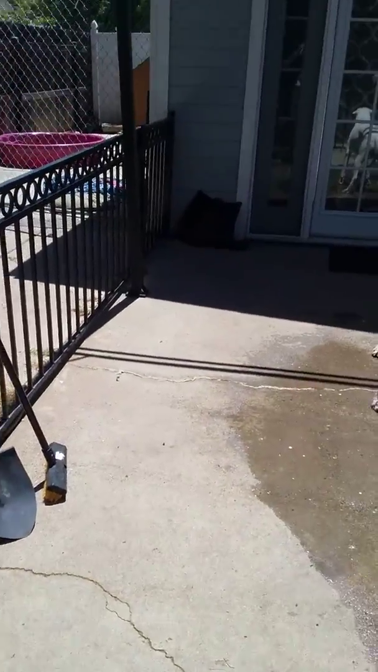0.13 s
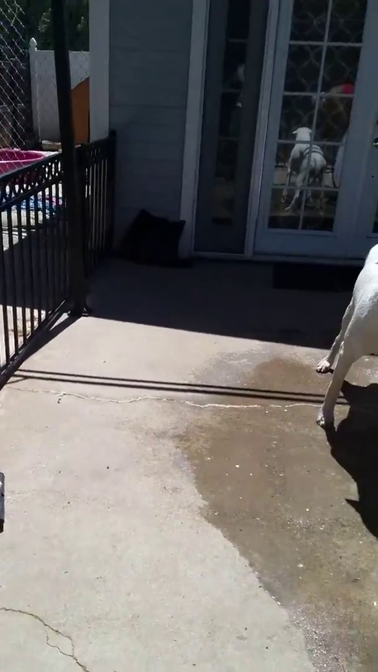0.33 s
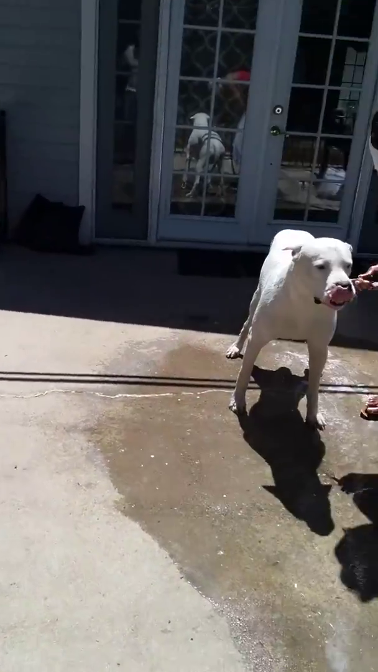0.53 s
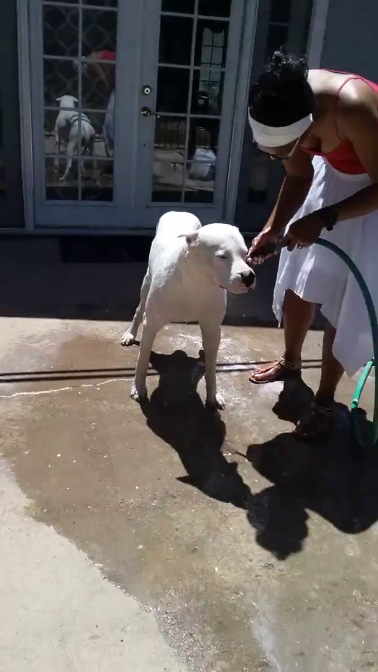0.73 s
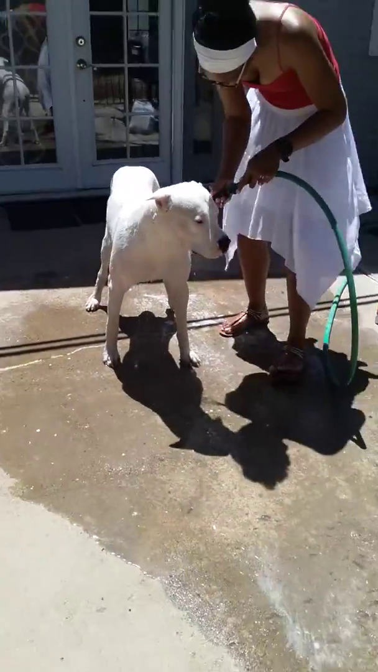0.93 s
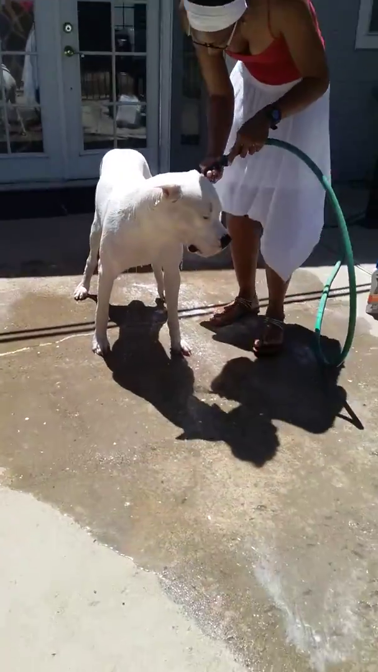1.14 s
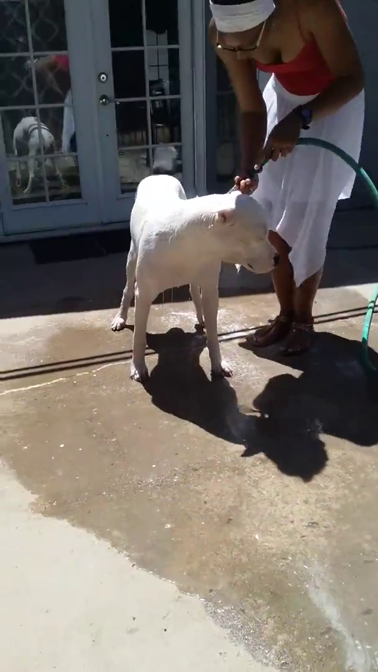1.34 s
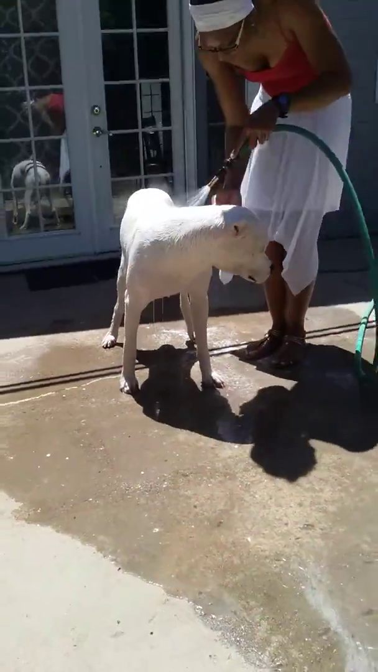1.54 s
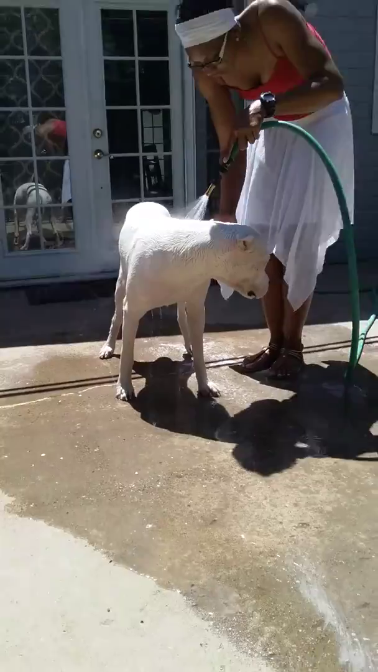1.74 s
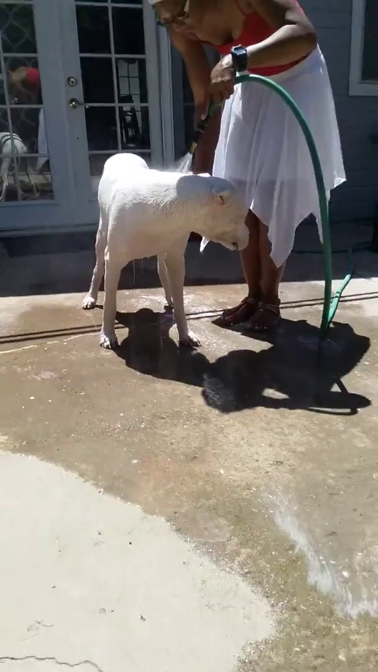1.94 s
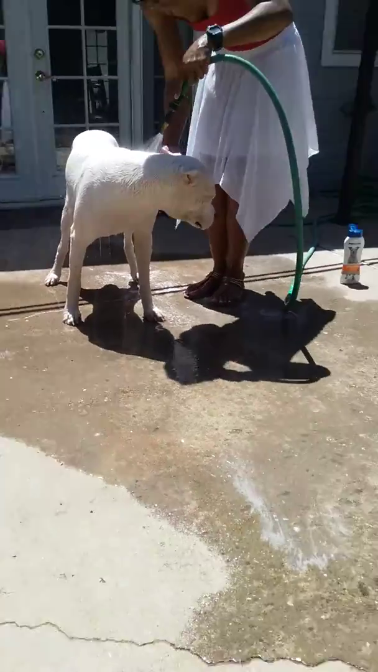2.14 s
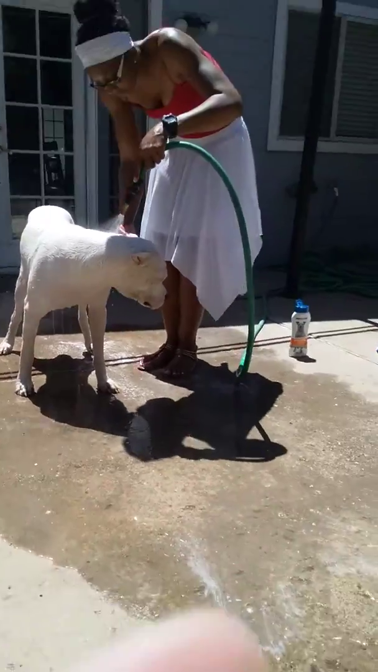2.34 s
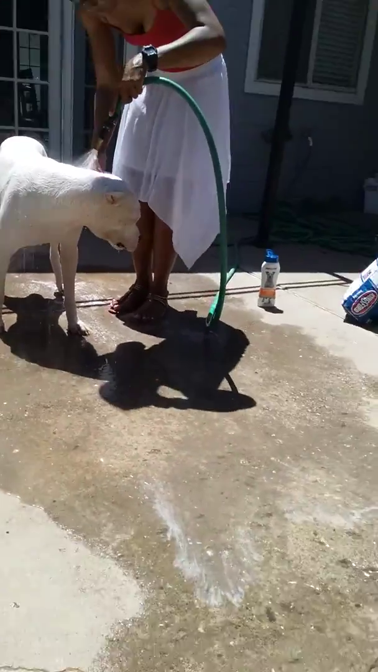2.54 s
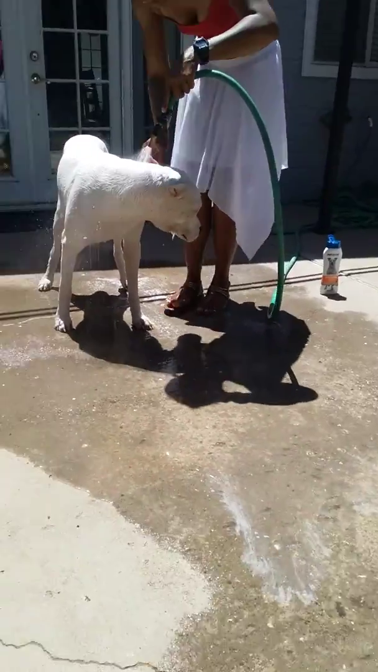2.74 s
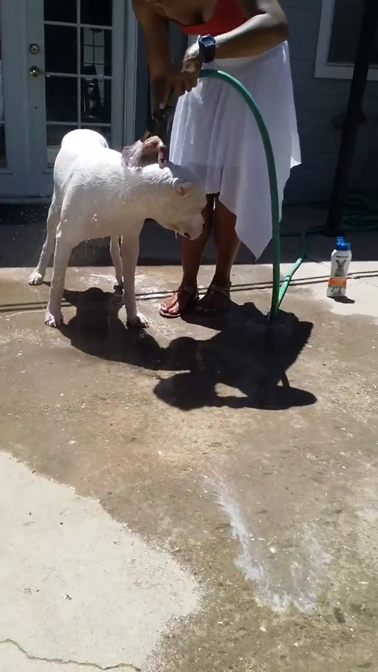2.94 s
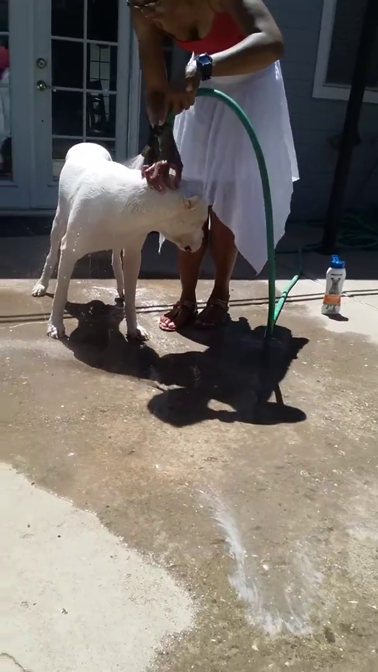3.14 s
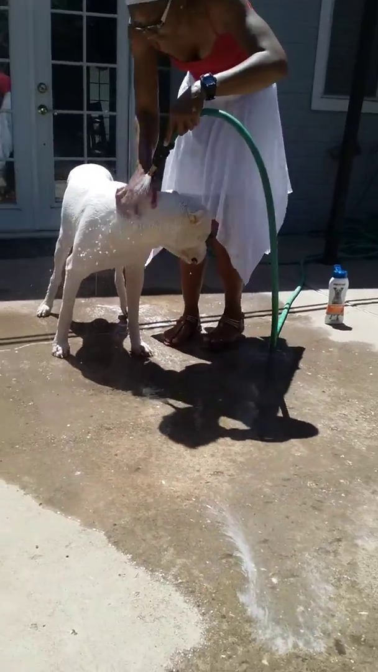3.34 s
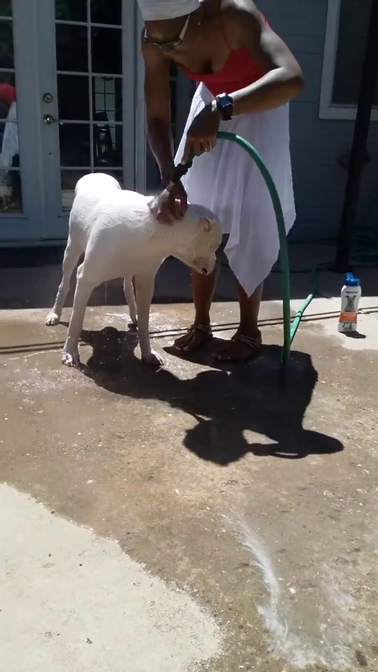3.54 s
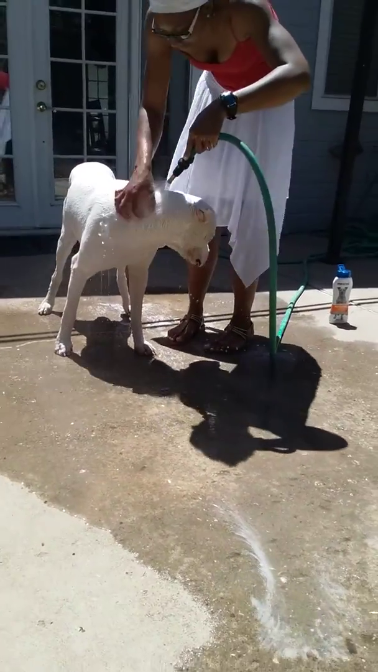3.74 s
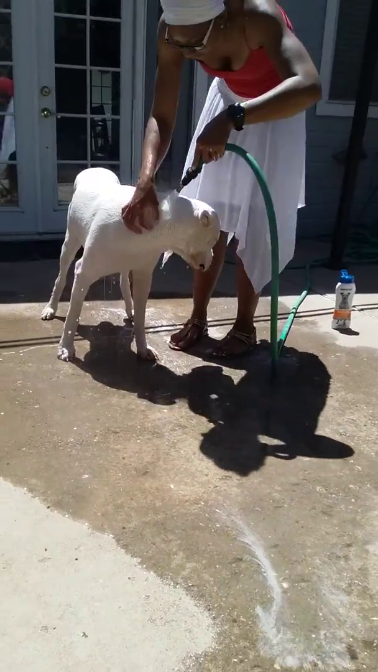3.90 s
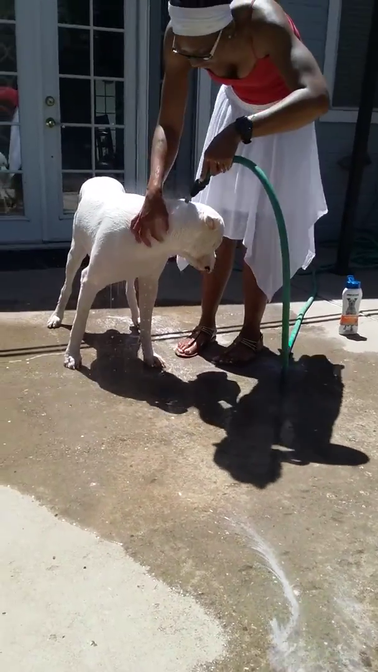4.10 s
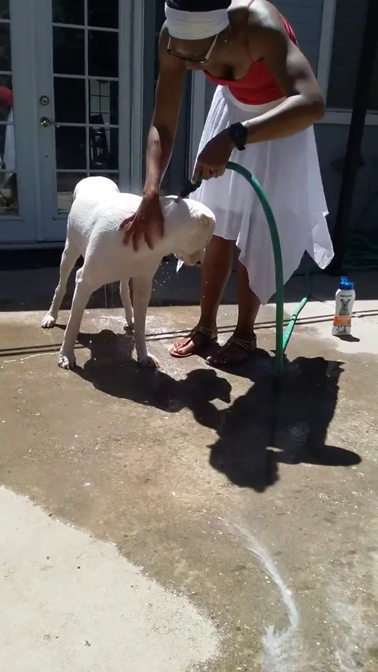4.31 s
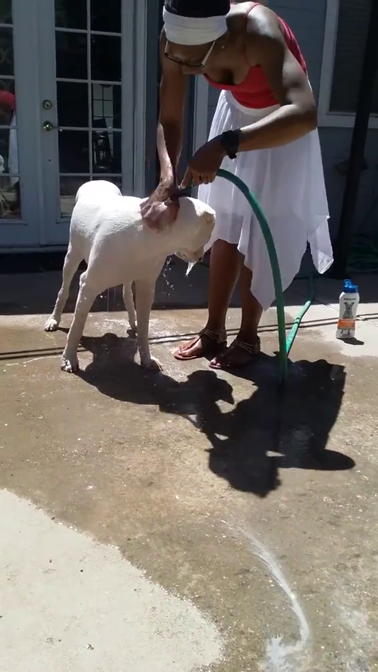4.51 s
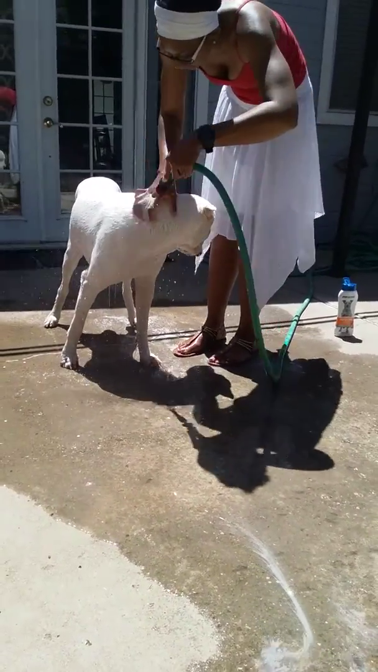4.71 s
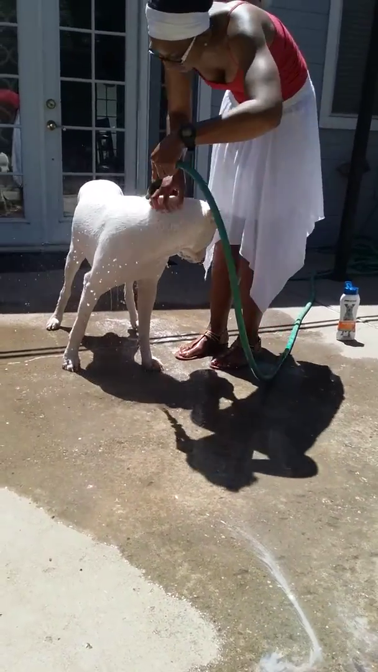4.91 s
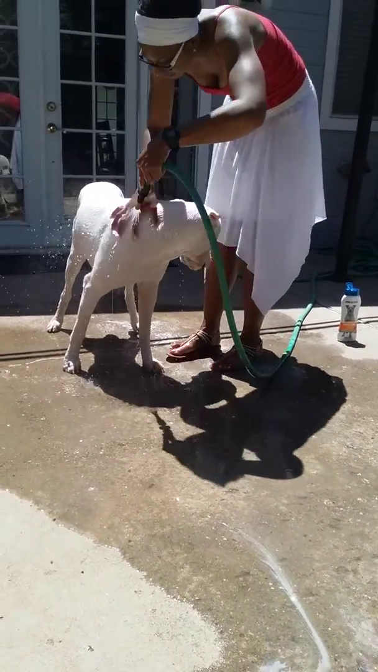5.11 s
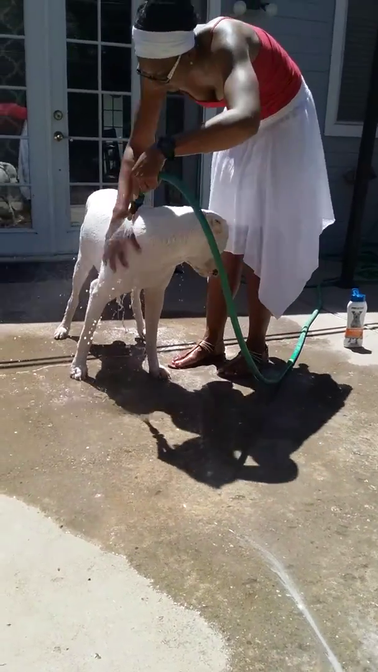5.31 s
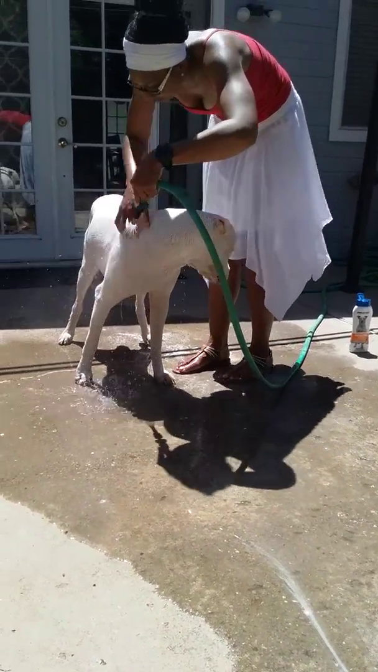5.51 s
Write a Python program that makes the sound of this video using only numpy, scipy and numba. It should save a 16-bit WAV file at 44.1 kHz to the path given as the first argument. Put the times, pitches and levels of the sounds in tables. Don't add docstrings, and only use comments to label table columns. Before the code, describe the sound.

Stereo phone capture outdoors: a sharp woody bang, slightly to the right, with brief yard echo, then a small knock and low rattling thuds. Hose water starts thin and rises into a bright, grainy hiss with spatter on fur and concrete, swelling and dipping unevenly as a hand moves through it. Soft scuffs, tiny slaps and isolated plinks appear over very faint distant traffic.

```python
import sys
import numpy as np
from scipy import signal
from scipy.fft import rfft, irfft, next_fast_len
from scipy.io import wavfile
from scipy.ndimage import uniform_filter1d, map_coordinates
from numba import njit

SR = 44100
rng = np.random.default_rng(int(sys.argv[2]) if len(sys.argv) > 2 else 0)


def invert_db(x):
    u = np.asarray(x, float) / 20
    return 10 ** u


def wav_out(sig):
    wavfile.write(sys.argv[1], SR, np.round(np.clip(np.atleast_2d(sig).T, -1, 1) * 32767).astype(np.int16))


N = 245136

# freq_hz, density_db_per_hz
SPRAY_COLOUR = [(350, -50), (600, -20), (869, -6.5), (1050, -14.5), (1350, -3), (1530, -9), (1700, -6),
                (2180, -4.5), (2440, -0.5), (3080, -2), (3480, 1.5), (5710, -4), (8270, -4), (15100, -14.5),
                (16000, -9.5)]
# freq_hz, left_minus_right_db
PORTS = [(60, 1.5), (110, -3), (200, -1), (380, -1.0), (700, -2), (1290, -0.5), (2380, -6), (4400, 1.5),
         (8120, 4.5), (15000, -3.5)]
# freq_hz, common_share_0_to_1
LIKENESS = [(60, 1), (300, 0.74), (1000, 0.34), (3000, 0.36), (8000, 0.4), (16000, 0.2)]
# freq_hz, left_lead_rad
LEAD = [(0, 0), (1290, -0.1), (1640, 0.0), (2150, 3.0), (2580, 1.1), (2930, 2.2), (3620, 9.7), (4480, 11.2),
        (5940, 9.6), (6630, 18.4), (8610, 18.8), (11500, 17.9), (13600, 15.1), (16500, 15.6)]
# freq_hz, density_db_per_hz
HUM = [(15, -50), (25, -27), (43, 0), (107, 1.5), (125, -0.5), (146, -22), (193, -3.5), (250, -17),
       (320, -45), (550, -120)]
# freq_hz, density_db_per_hz
SCUFF_COLOUR = [(250, 3), (350, -2), (500, -0.5), (700, 1)]
# time_s, hiss_db
NOZZLE = [(0.0, -11), (0.15, -5.5), (0.3, -11.5), (0.5, -3.5), (0.7, -9.5), (1.1, -7), (1.5, -6),
          (1.8, 0.5), (2.3, -1.5), (3.4, -0.3), (4.0, -0.6), (4.5, 0.5), (5.56, 0)]
# time_s, spatter_db
SPATTER = [(0.0, -9), (0.2, -8.5), (0.45, -0.5), (0.7, -4), (1.0, -5), (1.5, -1.5), (2.0, -0.04),
           (2.8, 2.25), (3.5, -5), (3.9, 4.5), (4.4, 2), (4.6, -2.5), (5.1, 6), (5.56, -2.5)]
HANDOVER_HZ = [4300, 6000]
# time_s, resonance_hz
HOLLOW = [(0.0, 1810), (0.49, 1360), (0.74, 1850), (1.28, 2060), (1.36, 1697), (2.54, 2030), (3.03, 1465),
          (3.39, 1730), (3.56, 1300), (3.68, 1694), (4.55, 1692), (4.66, 1380), (5.05, 1850), (5.56, 1698)]
# middle_s, length_s, swell_db, drop_pitch_hz
SURGES = [(0.83, 0.22, 4.5, 2500), (1.152, 0.092, 6, 1090.0), (1.2, 0.22, 5.5, 2640),
          (1.53, 0.21, 2.5, 4760.0), (1.61, 0.043, 6.5, 2570), (1.884, 0.13, 5.5, 2530),
          (1.893, 0.47, 3, 4900), (2.25, 0.15, 5.5, 1670), (2.49, 0.11, 5.5, 2550), (2.674, 0.1, 5, 2200),
          (2.89, 0.08, 8.5, 1550), (3.06, 0.28, 4.5, 1200), (3.2, 0.14, 5, 1184), (3.38, 0.05, 8, 2810),
          (3.541, 0.22, 5.5, 1089), (4.125, 0.298, 4, 2790), (4.346, 0.1, 7.5, 1970),
          (4.682, 0.14, 5.5, 4230), (4.686, 0.089, 5.5, 1006), (4.831, 0.06, 5.5, 1840),
          (5.495, 0.1016, 3, 3960), (4.27, .14, 1.5, 3500), (5.545, 0.064, 7.5, 3600),
          (5.465, 0.05, 5, 3700), (2.35, 0.14, 1, 8000), (3.36, .08, 1.5, 8500), (5.425, .03, 2.5, 4800),
          (4.28, .15, 3.5, 3500), (3.2, .2, 2.5, 4300), (5.1, .22, 2.5, 2450), (2.5, .25, 2, 2200),
          (.2, .08, 2, 2200), (2.7, 0.23, 3.0, 5200), (3.0, 0.24, 2, 4800), (.35, .12, 8, 9000),
          (3.6, 0.41, 2.5, 6600), (2.35, 0.34, 1.0, 1800)]
# middle_s, length_s, dip_db, drop_pitch_hz
LULLS = [(0.668, 0.24, -9, 1240), (0.953, 0.21, -5.5, 1130), (1.74, 0.2, -5.5, 1900),
         (2.02, 0.24, -3.5, 1100), (2.43, 0.23, -5, 1030), (2.518, 0.32, -2.5, 3200),
         (2.594, 0.066, -11, 1260), (2.773, 0.0716, -7, 1540.0), (2.772, 0.079, -8, 3200),
         (3.02, 0.12, -5, 2823), (3.666, 0.14, -7, 1850), (3.864, 0.15, -7, 1089), (4.25, 0.065, -11, 1293),
         (4.445, 0.1, -5, 1005), (4.992, 0.086, -7.5, 1010), (5.09, 0.057, -4, 3600),
         (5.2, 0.287, -7.5, 1130), (5.339, 0.21, -9, 2216), (5.372, 0.1, -4.5, 4360.0), (5.9, .1, -4, 8800),
         (1.77, .12, -2.5, 7500), (.232, .02, -8, 4600), (1.87, .1, -2, 4600), (4.15, .25, -1.5, 4600),
         (.52, .08, -2, 9000), (3.7, 0.092, -2, 6600), (1.6, .1, -2, 6600), (1.9, 0.044, -0.5, 4700),
         (3.25, 0.13, -1.5, 1600), (2.97, .05, -1.5, 1300), (0.037, 0.064, -6.5, 3300),
         (5.45, .2, -3, 6500), (2.45, .3, -1, 2900), (5.23, .05, -2.5, 4200), (4.86, .04, -2, 2200),
         (4.7, .15, -3.5, 6500)]
SURGE_OCTAVES = 0.58
# time_s, left_minus_right_db
FACING = [(0, -2), (.7, -3), (1.5, -1.2), (2.3, -1.5), (2.7, -0.5), (5.56, 0.3)]
NULL_HZ, NULL_WIDTH_HZ, NULL_FROM_S, NULL_DEPTH = 2200, 120, 3.3, 0.68
# delay_s, level_db
MIRRORS = [(.0031, -16.5), (.0053, -15.5), (.0083, -19), (0.014, -17.5)]
# freq_hz, width_hz, left_db, right_db
SHADE_SIDEWAYS = [(2050, 200, 5, 0), (3400, 600, -4, 1.5), (4230, 250, 2.5, 0.5), (4970, 300, 4, -3.5),
                  (5640, 200, -0.5, 1.5), (6200, 400, -0.5, 1.5), (11500, 1200, -2.5, -1.5)]
# freq_hz, width_hz, left_db, right_db
SHADE_FACING = [(1730, 200, -2, 3), (2300, 290, 4, -2), (3460, 560, -5, 2), (4080, 220, 0.4, 1.5),
                (4600, 450, 2.5, -3.5), (5050, 250, 1.5, -4.5), (5030, 90, 0.2, -6), (5530, 250, -0.5, -4),
                (7240, 450, 0.6, -3.5), (9550, 250, 0, 0.2)]
TURN_S, TURN_LENGTH_S = 2.7, .5
NEAR_GROUND_S = [.00152, .0016]
# time_s, left_db, right_db
GLINT = [(0, -14, -14), (2.2, -14, -12), (2.7, -8, -11), (3.1, -6, -10), (3.5, -6, -10), (4.0, -14, -11),
         (4.6, -12, -9), (5.0, -10, -6), (5.56, -10, -6)]
# time_s, level_db
TRAFFIC = [(0, -63), (.3, -61), (.49, -53), (.66, -56.5), (.8, -57), (.86, -66), (1.3, -65.5), (1.95, -62),
           (4.1, -61), (4.35, -63), (4.65, -61), (5.56, -59.5)]
# middle_s, length_s, level_db
SCUFFS = [(0.01, 0.095, -62.5), (0.507, 0.24, -55), (0.789, 0.072, -67), (1.153, 0.12, -55.5),
          (1.63, 0.17, -73), (1.858, 0.085, -67), (2.102, .05, -55), (2.165, 0.037, -59), (2.302, 0.1, -58),
          (3.017, 0.3, -69), (3.534, 0.17, -69), (3.926, 0.079, -68), (4.691, 0.21, -71.5),
          (5.35, 0.13, -70)]
SHUFFLE_DB = -67.5
# start_s, level_db, centre_hz, t60_s, left_minus_right_db
SMACKS = [(0.2413, -17, 447, 0.025, -4.5), (0.2425, -20, 1500, 0.022, -12), (.2412, -26.5, 2800, 0.055, 8),
          (0.5558, -29, 2800, 0.031, -13), (.5575, -30, 830, 0.025, -11.5), (2.3045, -33, 1550, 0.035, -13),
          (3.503, -40, 1560, 0.064, -5), (3.502, -36, 3200, 0.028, -9), (4.6081, -37, 3600, .05, 2),
          (5.2601, -44, 3400, .03, 0), (0.2417, -15, 2130, 0.055, -8.5), (0.23, -29.5, 4500, .015, 2.5),
          (.318, -28, 2000, 0.044, -10), (.345, -29, 1400, .04, -6), (.559, -27.5, 790, 0.024, -9),
          (2.304, -36, 490, 0.028, -6), (.018, -45, 1700, .03, -2), (.263, -36, 3200, .05, 0),
          (.292, -31, 1800, .04, -4.5)]
# start_s, crack_db, body_db, body_delay_s, decay_stretch, pitch_ratio
BANGS = [
    (0.2411, -1.5, 1.5, 0.0076, 0.81, 0.97),
    (0.556, -21.5, -23, 0.01077, 0.71, 0.92),
    (2.3015, -33, -19.5, 0.0126, 0.5, 0.95),
]
# freq_hz, level_db, t60_s
CRACK = [(460, -4.5, 0.025), (922, -0.5, 0.028), (1270, -18, 0.013), (1290, -8.5, 0.011), (1543, 6, 0.018),
         (1741, -1, 0.019), (2040, -7.5, 0.043), (2500, 2, 0.035), (2620, -29, 0.039), (3220, -10.5, 0.048),
         (4160, -7, 0.00964), (5130, -29.5, 0.0051)]
# freq_hz, t60_s, first_blow_db, second_blow_db, third_blow_db
BODY = [(116.6, .15, -22.5, -27, 2.5), (169.3, 0.16, -0.5, -24, -18), (224.4, 0.092, -6, 7, 9.5),
        (285.3, 0.14, -3, 5, 1), (330, 0.18, -10.5, -9, -6), (418, 0.11, -5, -13, 3.5),
        (482.3, 0.24, -3.5, -9, -9), (487, 0.25, -5.5, -6, -13), (595, 0.11, -10.5, -2, -3),
        (613, 2, -36.5, -31, -36), (735, 0.083, 2, 3, -31), (934, 0.19, -9, 1, -22)]
CRACK_PAN_DB, BODY_PAN_DB = -4.5, -2.2
# freq_hz, level_db, t60_s
YARD = [(151, -25.5, 0.83), (217, -23, 0.65), (340, -18, 0.47), (540, -29.5, 0.21), (930, -24.5, 0.63),
        (1470, -21, .5), (2260, -26.5, 0.49), (3800, -37, 0.28)]
YARD_DB = [
    -8,
    -23.5,
    -32.5,
]
# start_s, peak_db, pitch_hz, t60_s
THUDS = [(.266, -13.5, 471, 0.13), (.2715, -22, 300, .05), (.285, -25, 685, 0.14), (.27, -28, 900, .05),
         (.567, -23, 330, .025), (0.338, -21.5, 166, 0.11), (0.391, -47, 147, 0.041),
         (0.43, -29.5, 136, 0.086), (0.498, -44, 187.5, 0.085), (0.565, -29, 249.7, 0.03),
         (0.576, -38, 230, 0.04), (0.596, -24.5, 201, 0.056), (0.628, -34, 228, 0.063),
         (0.698, -35.5, 195, 0.063), (0.771, -42, 115, 0.05), (0.809, -40, 91.7, 0.063),
         (1.08, -53.5, 113, 0.059), (1.137, -49, 490, 0.14), (1.241, -47, 121.3, 0.06),
         (1.852, -50.5, 114.4, 0.053), (2.089, -51, 113, 0.06), (2.153, -42, 423, 0.037),
         (2.154, -43, 310, .04), (2.326, -34, 171, .05), (2.343, -39, 260, .05), (2.345, -43, 480, .04),
         (2.3035, -40, 1170, .04), (2.296, -44, 110, .04), (.578, -32, 520, .04), (.6, -34, 450, .04),
         (.616, -38, 700, .03), (2.1, -45, 330, .05), (3.13, -50, 300, .06), (3.21, -50, 300, .06),
         (2.334, -29.5, 91, 0.052), (2.887, -50, 194, 0.089)]
# start_s, peak_db, pitch_hz, t60_s, left_minus_right_db
SLAPS = [(3.5025, -29, 3250, 0.016, -1), (4.608, -23.5, 3650, 0.012, 2), (4.6224, -24.5, 3400, 0.016, -2),
         (4.5893, -28.5, 4300, .007, 2), (4.6192, -28, 4200, .008, 0), (4.642, -34, 3600, .012, 0),
         (4.6512, -33, 3400, .01, 0), (4.559, -36, 3100, .008, 0), (5.3118, -34, 3800, .007, 2),
         (1.1246, -37, 1820, .02, -4), (3.5705, -37, 3400, .008, 0), (3.5025, -34, 1900, .012, -3),
         (5.552, -31, 3500, .012, 0), (5.464, -33, 4400, .01, 2), (5.2598, -30, 3400, .014, 0),
         (4.8105, -31, 2500, .015, 0), (3.2085, -34, 3700, .012, 0), (5.4615, -33, 3600, .008, 0),
         (5.45, -34, 3300, .008, 0), (5.478, -34, 3200, .012, 0), (5.5385, -32, 3600, .007, 0),
         (5.53, -34, 3300, .012, 0)]
# start_s, peak_db, pitch_hz, t60_s, left_minus_right_db
PLINKS = [
    (3.56, -50, 1280, 0.044, -2),
    (4.5068, -38.5, 1720, 0.05, -5),
    (4.5352, -38.5, 1680, 0.046, -6),
    (5.3772, -28.5, 1707, 0.026, -7),
]
# middle_s, length_s, level_db, pitch_hz, width_hz
WHISTLES = [(4.19, 0.09, -53, 5200, 250), (4.28, 0.11, -49, 4300, 250), (4.31, .05, -49, 8300, 250),
            (4.36, .08, -43, 1750, 200), (3.5, .05, -49, 3700, 250), (4.02, 0.067, -48, 2740, 250),
            (4.6, .06, -50, 4950, 300), (0.834, 0.13, -48.5, 2540, 250), (4.82, 0.045, -49, 2420, 300),
            (5.6, 0.072, -46, 2500, 310), (3.25, .35, -50, 6600, 200), (2.36, .12, -51, 8200, 300),
            (4.25, .3, -46, 3500, 300), (5.3, .08, -52, 9100, 700), (2.7, .1, -52, 2500, 250),
            (2.27, .06, -46, 2150, 250), (2.4, .08, -53, 4400, 300), (3.12, .08, -52, 1490, 250)]


@njit
def svf(x, hz, width):
    y, b, l = np.empty(len(x)), 0., 0.
    g, k = np.tan(np.pi * hz / SR), width / hz
    for i in range(len(x)):
        v = (b + g * (x[i] - l)) / (1 + g * (g + k))
        b, l, y[i] = 2 * v - b, l + 2 * g * v, k * v
    return y


def unit(x):
    return x / np.sqrt(np.mean(x ** 2))


def steep_band(x, hz, width):
    hz, width = float(hz), float(width)
    return unit(svf(svf(x, hz, width), hz, width))


def at_hz(table, hz):
    freq_hz, value = np.array(table).T
    return np.interp(np.log(hz), np.log(freq_hz), value)


def curves(table):
    s, *columns = np.transpose(table)
    return np.array([np.interp(np.arange(N) / SR, s, c) for c in columns])


def walk(rate):
    k = int(SR / rate)
    held = np.repeat(rng.standard_normal(N // k + 1), k)
    return unit(uniform_filter1d(uniform_filter1d(held, k), k)[:N])


def bell(s, length_s):
    return np.exp(-((np.arange(N) / SR - s) / (length_s / 2)) ** 2)


def ring(hz, t60, rise_s):
    t = np.arange(int(1.3 * t60 * SR) + 64) / SR
    return np.sin(2 * np.pi * hz * t) * (1 - np.exp(-t / rise_s)) * np.exp(-np.log(1000) * t / t60)


def add(out, s, x):
    i = int(s * SR)
    out[i:i + len(x)] += x[:len(out) - i]


def pair(hz, width, x):
    common = at_hz(LIKENESS, hz)
    m = steep_band(x, hz, width)
    alone = np.array([np.roll(m, N // 3), np.roll(m, -N // 3)])
    both = np.sqrt(common) * m + np.sqrt(1 - common) * alone
    return both * invert_db(at_hz(PORTS, hz) / 2 * np.array([[1], [-1]]))


def lagged(x):
    size = next_fast_len(N)
    hz = np.arange(size // 2 + 1) * SR / size
    turn = np.exp(-1j * np.interp(hz, *np.transpose(LEAD)))
    return np.array([x[0], irfft(rfft(x[1], size) * turn, size)[:N]])


def drops(rate, spread_db):
    struck = rng.random(N) < rate / SR
    sign = rng.choice([-1., 1.], N)
    return struck * sign * invert_db(spread_db * np.minimum(rng.exponential(size=N), 5))


def bubbles(hz, t60, count):
    out = np.zeros(N)
    for when, pitch, size in rng.random((count, 3)):
        add(out, when * N / SR, size ** 2 * ring(hz * (.93 + .14 * pitch), t60, 0.00091))
    return unit(out)


def spray():
    hiss_db, spatter_db, pan_db, hollow_hz = (curves(c)[0] for c in (NOZZLE, SPATTER, FACING, HOLLOW))
    strokes = np.array(SURGES + LULLS)
    coarse = np.arange(N)[::64]
    swells = np.array([bell(s, length_s)[::64] for s, length_s, *_ in strokes])
    centres = 760 * 2 ** np.arange(0, 4.5, 1 / 6)
    patches, out = [walk(9) for _ in range(8)], 0
    for k, hz in enumerate(centres):
        pitch = np.log(hz)
        share = np.interp(pitch, np.log(HANDOVER_HZ), [0, 1])
        reach_db = strokes[:, 2] * np.exp(-(np.log2(hz / strokes[:, 3]) / SURGE_OCTAVES) ** 2)
        stroke_db = np.interp(np.arange(N), coarse, reach_db @ swells)
        change_db = share * (hiss_db + .45 * patches[-1]) + (1 - share) * spatter_db + stroke_db
        grain = np.interp(pitch, np.log([800, 2500, 9000]), [.4, .5, .12])
        own = unit(drops(1500, 3.16))
        if k == 0:
            heavy = unit(own * np.abs(own) ** .6)
        impacts = np.sqrt(grain) * unit(own + .7 * heavy) + np.sqrt(1 - grain) * rng.standard_normal(N)
        singing = np.interp(pitch, np.log([800, 2500, 6000, 12000]), [.22, .28, .3, .3])
        impacts += singing * np.sqrt(0.24 * hz / SR) * bubbles(hz, 0.048, count=160)
        flicker_db = 0.33 * patches[k // 4] + 0.45 * walk(6) + 0.95 * walk(16) + 1.9 * walk(45)
        flicker_db *= min(5000 / hz, 1) ** .3
        db = at_hz(SPRAY_COLOUR, hz) + 10 * np.log10(hz) + change_db + flicker_db
        db += 4.6 * np.exp(-(np.log(hz / hollow_hz) / 0.13) ** 2)
        out = out + invert_db(db) * pair(hz, 0.21 * hz / np.sinc(2 * hz / SR), impacts)
    out = lagged(out) / np.sqrt(np.mean(out[:, N // 2:] ** 2)) * invert_db(-38.0)
    cancelled = np.clip((np.arange(N) / SR - NULL_FROM_S) / .1, 0, 1) * NULL_DEPTH
    out = out - cancelled * svf(out.mean(axis=0), 1. * NULL_HZ, 1. * NULL_WIDTH_HZ)
    return out * invert_db(.5 * np.array([pan_db, -pan_db]))


def mirrored(x):
    out = x.copy()
    for delay_s, db in MIRRORS:
        place = np.arange(N) - SR * (delay_s + 0.000224 * walk(1.2))
        out += invert_db(db) * np.array([map_coordinates(port, [place], order=2, mode="mirror") for port in x])
    return out


def shaded(x):
    size = next_fast_len(N)
    hz = np.arange(size // 2 + 1) * SR / size
    spectrum = rfft(x, size)

    def held(shade):
        db = sum(np.outer(sides, np.exp(-((hz - f) / width) ** 2)) for f, width, *sides in shade)
        return irfft(spectrum * invert_db(db), size)[:, :N]

    sideways, facing = held(SHADE_SIDEWAYS), held(SHADE_FACING)
    turned = np.clip((np.arange(N) / SR - TURN_S) / TURN_LENGTH_S + .5, 0, 1)
    out = sideways + turned * (facing - sideways)
    mist = signal.sosfiltfilt(signal.butter(2, [5000, 11000], "band", fs=SR, output="sos"), out)
    for port, fine, delay_s, db in zip(out, mist, NEAR_GROUND_S, curves(GLINT)):
        place = np.arange(N) - SR * delay_s * (1 + .008 * walk(1.5))
        echo = map_coordinates(fine, [place], order=2, mode="mirror")
        port += (fine + invert_db(db) * echo) / np.sqrt(1 + invert_db(2 * db)) - fine
    return out


def murmur(colour, low_hz, count):
    out = 0
    for hz in low_hz * 2 ** (np.arange(count) / 3):
        db = at_hz(colour, hz) + 10 * np.log10(hz) + 2.7 * walk(5)
        out = out + invert_db(db) * pair(hz, 0.33 * hz, rng.standard_normal(N))
    return unit(out)


def traffic():
    scuffing = invert_db(SHUFFLE_DB) + sum(invert_db(db) * bell(s, length_s) for s, length_s, db in SCUFFS)
    hum = murmur(HUM, 30.1, count=10) * invert_db(curves(TRAFFIC)[0] + 1.0)
    return hum + murmur(SCUFF_COLOUR, 274.0, count=5) * scuffing * invert_db(-0.5)


def smacks():
    out, age = np.zeros((2, N)), np.arange(SR // 10) / SR
    for s, db, hz, t60, pan_db in SMACKS:
        lowpass = signal.butter(4, 1.44 * hz, fs=SR, output="sos")
        dull = signal.sosfilt(lowpass, rng.standard_normal(len(age)))
        puff = steep_band(dull, hz, 1.23 * hz) * invert_db(db - 60 * age / t60) * (1 - np.exp(-age / 0.00054))
        add(out[0], s + 8 / SR, invert_db(pan_db / 2) * puff)
        add(out[1], s, invert_db(-pan_db / 2) * puff)
    return out


def ports(x, pan_db, lag):
    return np.array([np.roll(x, lag) * invert_db(pan_db / 2), x * invert_db(-pan_db / 2)])


def door():
    cracks, bodies = np.zeros((2, N))
    for n, (s, crack_db, body_db, late_s, stretch, ratio) in enumerate(BANGS):
        crack = np.zeros(SR // 4)
        for k, (hz, db, t60) in enumerate(CRACK):
            add(crack, 0, (-1) ** k * invert_db(db) * ring(hz * ratio, t60 * stretch, 0.00039))
        for after_s, db in [(0, -0.5), (.0069, -10), (.0101, -13)]:
            add(cracks, s + after_s * stretch ** 2, invert_db(crack_db + db - 6.5) * crack)
        for hz, t60, *db in BODY:
            add(bodies, s + late_s, invert_db(body_db + db[n] - 10.5) * ring(hz * ratio, t60 * stretch, 0.0011))
    bodies = signal.sosfilt(signal.butter(2, 90, "high", fs=SR, output="sos"), bodies)
    return ports(cracks, CRACK_PAN_DB, lag=8) + ports(bodies, BODY_PAN_DB, lag=16)


def yard():
    out, t = 0, np.arange(N) / SR
    for hz, db, t60 in YARD:
        fade = 0
        for (s, *_, late_s, stretch, _), blow_db in zip(BANGS, YARD_DB):
            age = np.maximum(t - s - 3 / hz, 0)
            fade = fade + invert_db(blow_db - 60 * age / (t60 * stretch)) * (1 - np.exp(-age / 0.00257))
        mid, side = (steep_band(rng.standard_normal(N), hz, 0.6 * hz) for _ in range(2))
        wide = mid + min(hz / 1000, 1) * side * np.array([[1], [-1]])
        out = out + invert_db(db + 2.2 * walk(40)) * fade * wide
    return out


def knocks(table, rise_s, second):
    out = np.zeros((2, N))
    for s, db, hz, t60, *pan_db in table:
        neighbours = ring(0.915 * hz, t60, rise_s)
        higher = ring(1.3 * hz, t60, rise_s)
        x = ring(hz, t60, rise_s) + second * higher
        add(x, 0, second * neighbours)
        for channel, sign in zip(out, (1, -1)):
            add(channel, s, invert_db(db + sign * sum(pan_db) / 2) * x)
    return out


def whistles():
    noise, out = rng.standard_normal(N), 0
    for s, length_s, db, hz, width in WHISTLES:
        out = out + invert_db(db) * bell(s, length_s) * pair(hz, width, noise)
    return lagged(out)


def scene():
    small = knocks(THUDS, 0.0047, 0.28) + knocks(SLAPS, 0.00051, 0.51)
    small += invert_db(2.0) * knocks(PLINKS, 0.00094, 0.11)
    return shaded(mirrored(spray())) + traffic() + smacks() + door() + yard() + small + whistles()


def band_limit(x):
    return signal.sosfilt(signal.butter(12, 15790, fs=SR, output="sos"), x)


def record(dry):
    fade = np.minimum(np.arange(N) / (0.045 * SR) + 0.41, 1)
    rounded = np.tanh(dry * fade * 0.89) / 0.89
    x = signal.sosfilt(signal.butter(3, 60, "high", fs=SR, output="sos"), rounded)
    x = signal.sosfilt(signal.ellip(12, .2, 80, 15700, fs=SR, output="sos"), x)
    return band_limit(x)


dry = scene()
out = record(dry)
wav_out(out)
```